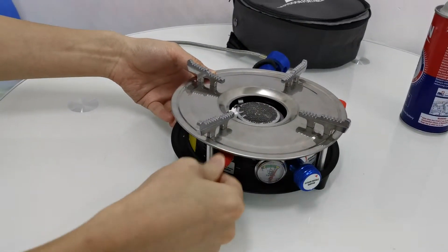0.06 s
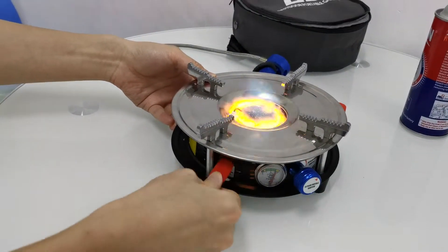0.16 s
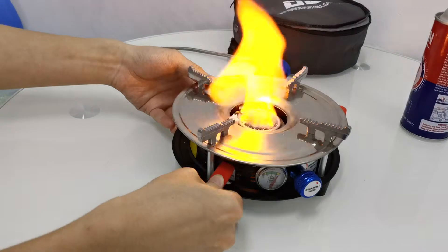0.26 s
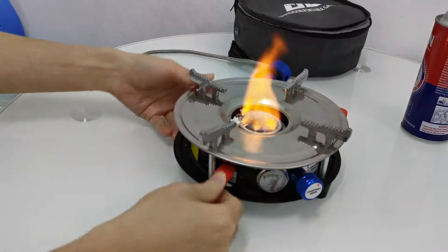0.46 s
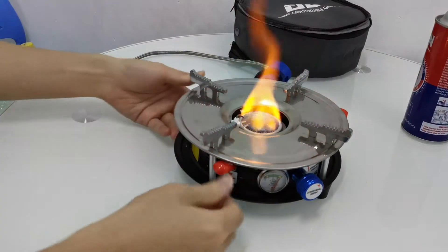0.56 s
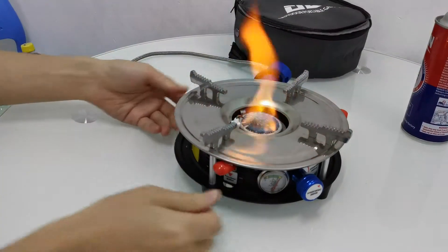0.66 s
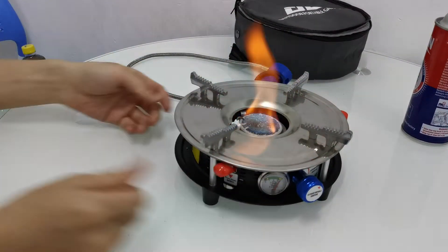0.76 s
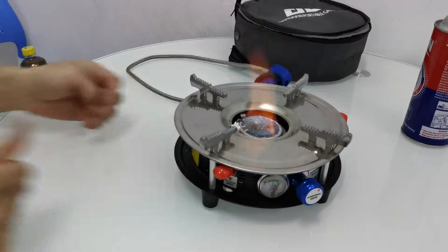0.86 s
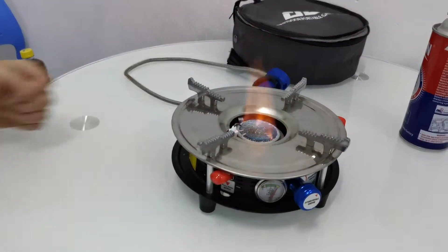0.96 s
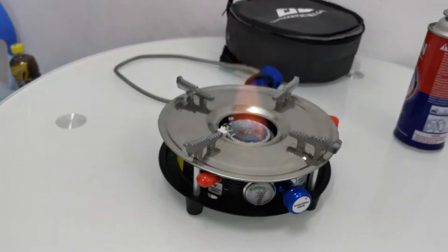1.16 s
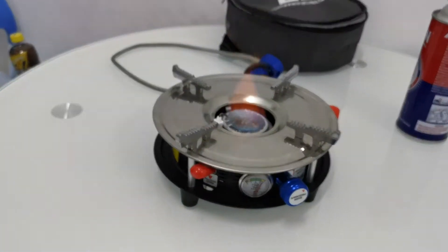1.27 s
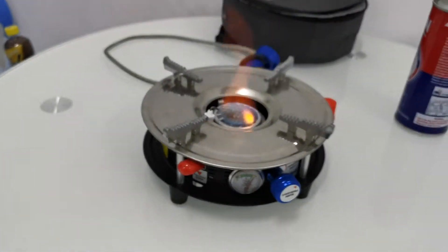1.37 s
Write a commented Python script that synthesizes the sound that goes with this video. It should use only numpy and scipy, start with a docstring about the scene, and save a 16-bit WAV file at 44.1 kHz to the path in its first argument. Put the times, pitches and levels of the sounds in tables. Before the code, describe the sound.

A gas stove igniter clicks sharply and the flame lights softly in an echoing room.

```python
"""A hard, echoing room: a portable gas stove is lit on a table.
The igniter button ticks, its piezo hammer snaps and rings the steel top, the gas catches with a soft
puff, and the button knocks back into the frame. The room rings on after each click; the flame settles
to a low flutter over the thin hiss of the jet. A noise suppressor dulls the quiet stretches."""
import sys
import numpy as np
from scipy import signal
from scipy.fft import rfft, irfft
from scipy.io import wavfile
from scipy.ndimage import uniform_filter1d

SR = 44100
rng = np.random.default_rng(int(sys.argv[2]) if len(sys.argv) > 2 else 0)


def generate_wav(signal):
    """Clip the signal to [-1, 1] and save it as 16-bit WAV at the path in sys.argv[1]."""
    frames = np.transpose(np.atleast_2d(signal))
    scaled = np.clip(frames, -1, 1) * 32767
    pcm = np.round(scaled).astype(np.int16)
    wavfile.write(sys.argv[1], SR, pcm)


N = 61739
N_FFT = 65536
T, HZ = np.arange(N) / SR, np.fft.rfftfreq(N_FFT, 1 / SR)


# hammer blow and rebounds: t/s, level/dB, left-right/dB
HAMMER_HITS = [(0.2341, -2, -4), (0.2351, 0, -2), (.2361, -6, -12), (.2371, -5.5, 1.5), (0.2383, -10.5, -7)]
# hammer contact spectrum: f/Hz, level/dB
SNAP_SPECTRUM = [(30, 5), (200, -9), (600, -12), (950, -6), (1450, -13.5), (2450, 1), (3200, -3),
                 (4100, -10), (4900, 2), (5600, -1), (6400, -6.5), (7800, 1.5), (8700, -18), (10300, -22.5),
                 (12000, -29.5), (15000, -28)]
# steel top modes: f/Hz, level/dB, t60/s
STEEL_MODES = [(885, -36, .04), (950, -56, 1.0), (2116, -56, 1.0), (2340, -35, 0.024), (2445, -33, .04),
               (2468, -53, 1.1), (2643, -39, 0.044), (2650, -54, 1.3), (4810, -32, .025), (5100, -23, .015),
               (5075, -54, .9), (5560, -35, .04), (5568, -57, 1.0), (7150, -40, .05), (7556, -51, .7),
               (7830, -34, .04), (7834, -54, .9)]
def hammer_snap(start_s):
    """The piezo hammer strikes and rebounds, ringing the steel top and jolting the table."""
    snap = sum(amp(db - 3) * sides(pan_db) * delayed(contact(SNAP_SPECTRUM, t60_s=.009), s)
               for s, db, pan_db in HAMMER_HITS)
    steel = ringing(STEEL_MODES, rise_s=.0004, right_lag_s=.00005) * sides(db=-4)
    thump = ringing([(64, -31, .033)], rise_s=.001) * sides(db=8)
    return snap + delayed(steel, start_s) + delayed(thump, start_s)


# button contact spectrum: f/Hz, level/dB
TICK_SPECTRUM = [(60, -29), (800, -12), (2000, -12.5), (2800, -3), (3500, -9), (5000, 1), (6000, -4.5),
                 (7400, 4.5), (8400, -23), (14500, -30.5)]
# button spring modes: f/Hz, level/dB, t60/s
SPRING_MODES = [(2584, -59, .75), (2900, -60, .9), (2945, -61, .7), (3920, -66, .9), (5033, -58, .55),
                (6160, -65, .9), (6993, -60, .5), (7080, -58, .45), (7515, -60, .7)]
def button_tick(start_s):
    """The pressed button ticks and its spring rings."""
    tick = amp(-16) * contact(TICK_SPECTRUM, t60_s=.022)
    return delayed(tick, start_s) + delayed(ringing(SPRING_MODES, rise_s=.001), start_s)


# button return hits: t/s, level/dB
RETURN_HITS = [(.5872, -10), (.5893, -1), (.5918, 0), (.5965, -8)]
# return contact spectrum: f/Hz, level/dB
KNOCK_SPECTRUM = [(60, -24), (250, -26), (450, -16), (620, -3), (760, -10), (1020, -3), (1250, -10),
                  (1700, -5), (2500, -5), (3200, -12), (4300, -9), (6400, -12), (7700, -7), (9000, -27),
                  (15000, -38)]
# stove frame modes: f/Hz, level/dB, t60/s
FRAME_MODES = [(327, -55, 1.05), (355, -48, .19), (584, -47, .5), (613, -47, 0.5), (600, -37, .06),
               (814, -50, .5), (870, -47, .25), (967, -53, .6), (1019, -53, .45), (1012, -35, .045),
               (1417, -49, .16), (1654, -44, .13), (2575, -52, .25)]
def button_knock():
    """The button springs back in four quick hits; the frame rings from the second."""
    knock = sum(amp(db - 17) * delayed(contact(KNOCK_SPECTRUM, t60_s=.0286), s) for s, db in RETURN_HITS)
    frame = delayed(ringing(FRAME_MODES, rise_s=.0015), RETURN_HITS[1][0])
    return (knock + frame) * sides(db=-1.5)


# tick echo spectrum: f/Hz, level/dB
TICK_ECHO_SPECTRUM = [(60, 3), (300, 1), (900, -2.5), (2100, -8), (2850, 4), (3400, -10), (5000, -2),
                      (5500, -6), (6600, -4), (7200, 4), (7650, 0), (8400, -22), (15000, -27)]
# snap echo spectrum: f/Hz, level/dB
SNAP_ECHO_SPECTRUM = [(60, -8.5), (300, -10.5), (650, -15.5), (950, -6.5), (1400, -13.5), (2000, -.5),
                      (2550, 1), (3200, -4.5), (4200, -8), (5250, -4.5), (6300, -7.5), (7600, -0.5),
                      (8600, -12), (10000, -19), (11500, -26.5), (15000, -30)]
# knock echo spectrum: f/Hz, level/dB
KNOCK_ECHO_SPECTRUM = [(60, -12), (200, -11), (340, -6), (440, -11), (600, 2), (740, -6), (960, -1),
                       (1250, -10), (1700, -7), (2550, -7), (3500, -15), (5500, -19), (7600, -18),
                       (8700, -30), (15000, -41)]
def room(clicks, tick_s, snap_s, knock_s):
    """Early reflections off the table and nearest wall, then long tails from the bare walls."""
    table = amp(-12) * convolve(clicks, rattle(t60_s=.039))
    wall = amp(-19) * delayed(clicks, start_s=.0168)
    tick_tail = amp(-49.5) * echo(tick_s, TICK_ECHO_SPECTRUM) * sides(db=5)
    snap_tail = amp(-35.3) * echo(snap_s, SNAP_ECHO_SPECTRUM)
    knock_tail = amp(-45) * echo(knock_s, KNOCK_ECHO_SPECTRUM)
    return table + wall + tick_tail + snap_tail + knock_tail


# room decay: f/Hz, t60/s
ROOM_DECAY = [(100, 1.1), (500, 1.0), (1000, 1.55), (2300, 1.85), (4500, 1.42), (7500, 1.3), (10000, .9),
              (15000, .85)]
def echo(start_s, spectrum, rise_s=.013):
    """Diffuse tail of one click: noise decaying band by band, the top treble first."""
    hz, t, bands = signal.stft(noise(spectrum), SR, nperseg=256)
    decay = amp(-60 * t / lookup(ROOM_DECAY, hz)[:, None])
    tail = signal.istft(bands * decay, SR, nperseg=256)[1][:, :N]
    return delayed(tail * np.minimum(T / rise_s, 1), start_s)


# flame flaring, sinking and swelling: t/s, level/dB
FLAME_ENVELOPE = [(.25, -62), (.55, -62), (.79, -55), (.9, -60), (.99, -63), (1.04, -60), (1.22, -60),
                  (1.4, -61.5)]
# flame spectrum: f/Hz, level/dB
FLAME_SPECTRUM = [(25, -15), (80, -9), (126, 4), (155, -3), (200, -4), (320, -4.5), (480, -10), (650, -19),
                  (1000, -33), (3000, -45), (9000, -64)]
# ignition puff spectrum: f/Hz, level/dB
PUFF_SPECTRUM = [(20, -9.5), (52, -2), (85, -7.5), (130, -5), (250, -33), (800, -19), (4000, -46)]
def burner(catch_s=.25, rise_s=.086, puff_peak_s=.405, puff_width_s=.1, flutter_db=2.2, flutter_hz=35):
    """The gas catches with a puff, flares and settles to a fluttering flame."""
    lit = np.clip((T - catch_s) / rise_s, 0, 1)
    lowpass = np.exp(-(HZ / flutter_hz) ** 2)
    flutter = unit_rms(irfft(rfft(rng.standard_normal(N_FFT)) * lowpass)[:N])
    flame_db = np.interp(T, *np.transpose(FLAME_ENVELOPE)) + flutter_db * flutter
    flame = amp(flame_db) * noise(FLAME_SPECTRUM)
    puff = amp(-54) / (1 + ((T - puff_peak_s) / puff_width_s) ** 2) * noise(PUFF_SPECTRUM)
    return lit * (flame + puff)


# jet spectrum: f/Hz, level/dB
JET_SPECTRUM = [(1000, -29), (4000, -7.5), (6000, -4.5), (7000, 3), (7600, 1.5), (8400, -27), (11000, -29),
                (15000, -45)]
def gas_jet():
    """The jet hisses throughout, strongest near 7 kHz."""
    return amp(-59.8) * noise(JET_SPECTRUM)


# room air spectrum: f/Hz, level/dB
AIR_SPECTRUM = [(20, -5.5), (50, -0.5), (80, -7.5), (140, -5), (300, -10), (700, -13), (1300, -19),
                (2100, -16), (3500, -24), (8000, -28), (9000, -37.5), (15000, -42)]
def room_air():
    """Faint steady rush of the room's air."""
    return amp(-60.5) * noise(AIR_SPECTRUM)


# left-right coherence: f/Hz, coherence/1
COHERENCE = [(60, 0.65), (140, 0.85), (290, 0.85), (640, 0.85), (1400, 0.54), (3100, 0.057), (7000, 0),
             (15000, 0)]
# stereo balance: f/Hz, left-right/dB
BALANCE = [(60, -2.5), (250, -4), (600, -5), (3000, -3.5), (7000, -5.5), (15000, -7)]
def noise(spectrum):
    """Steady stereo noise of unit rms, alike in the bass and stronger on the right."""
    left, independent = rfft(rng.standard_normal((2, N_FFT)))
    coherence = lookup(COHERENCE, HZ)
    right = coherence * left + np.sqrt(1 - coherence ** 2) * independent
    pair = np.array([left, right]) * sides(lookup(BALANCE, HZ))
    return unit_rms(irfft(pair * amp(lookup(spectrum, HZ)))[:, :N])


def contact(spectrum, t60_s):
    """One contact: a short burst coloured by a minimum-phase pulse of unit energy."""
    log_gain = np.log(amp(lookup(spectrum, abs(np.fft.fftfreq(4096, 1 / SR)))))
    pulse = np.fft.ifft(np.exp(np.conj(signal.hilbert(log_gain)))).real
    return convolve(rattle(t60_s), pulse / np.linalg.norm(pulse))


def rattle(t60_s):
    """Dense dying burst with a flat spectrum: the many short modes of a small part."""
    fade = amp(-60 * T[:4096] / t60_s)
    burst = rng.standard_normal((2, len(fade))) * fade
    burst[1] += signal.lfilter(*signal.butter(1, 1500, fs=SR), burst[0] - burst[1])  # shared bass
    for _ in range(4):
        whitened = irfft(np.exp(1j * np.angle(rfft(burst))))
        burst = whitened * np.minimum(1, 10 * fade)
    return burst / np.linalg.norm(burst, axis=1, keepdims=True)


def ringing(modes, rise_s, right_lag_s=0):
    """Modes (f/Hz, level/dB, t60/s) of a struck part build up and decay."""
    length_s = max(t60 for _, _, t60 in modes)
    t = np.maximum(T[T < length_s] - np.array([[0], [right_lag_s]]), 0)
    ring = sum(amp(db - 60 * t / t60) * np.cos(2 * np.pi * hz * t) for hz, db, t60 in modes)
    return ring * (1 - np.exp(-t / rise_s))


def amp(db):
    """Decibels to gain."""
    return 10 ** (np.asarray(db) / 20)


def unit_rms(x):
    """Scales to rms 1."""
    return x / np.sqrt(np.mean(x ** 2) + 1e-20)


def lookup(table, hz):
    """Interpolates on a log-frequency axis."""
    f, value = np.transpose(table)
    return np.interp(np.log(hz + 1), np.log(f + 1), value)


def sides(db):
    """Stereo gains for a left-minus-right level."""
    return amp(np.array([db, -db]) / 2).reshape(2, -1)


def convolve(a, b):
    """Convolution in time, cut to N samples."""
    return signal.fftconvolve(np.atleast_2d(a), np.atleast_2d(b), axes=1)[:, :N]


def delayed(x, start_s):
    """Places x at start_s in N samples."""
    return np.pad(x, ((0, 0), (round(start_s * SR), N)))[:, :N]


def scene():
    """Three clicks and their echoes over flame, jet and room air."""
    tick_s, snap_s, knock_s = .008, HAMMER_HITS[0][0], RETURN_HITS[0][0]
    clicks = button_tick(tick_s) + hammer_snap(snap_s) + button_knock()
    return clicks + room(clicks, tick_s, snap_s, knock_s) + burner() + gas_jet() + room_air()


def record(dry, threshold_db=-50.5, knee_db=.5, cut_db=8.3, corner_hz=1000, lag_s=.105, edge_hz=15250):
    """A noise suppressor slowly turns the treble down once it is quiet; then the band limit."""
    treble = irfft(rfft(dry, N_FFT) * HZ ** 2 / (HZ ** 2 + corner_hz ** 2))[:, :N]
    power = uniform_filter1d((treble ** 2).mean(0), size=900)
    level_db = 10 * np.log10(abs(power) + 1e-12)
    quiet = .5 - .5 * np.tanh((level_db - threshold_db) / knee_db)
    lagged = convolve(quiet, np.exp(-T / lag_s) / (lag_s * SR))
    treble_gain = amp(-cut_db * np.minimum(quiet, lagged))  # closes slowly, opens at once
    suppressed = dry - treble * (1 - treble_gain)
    lowpass = signal.firwin(401, edge_hz, window=("kaiser", 8), fs=SR)
    return signal.oaconvolve(suppressed, lowpass[None], "same")


dry = scene()
out = record(dry)
generate_wav(out)
```